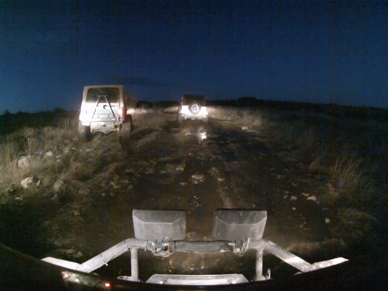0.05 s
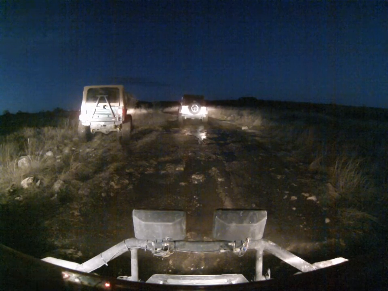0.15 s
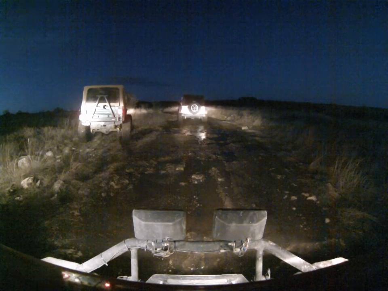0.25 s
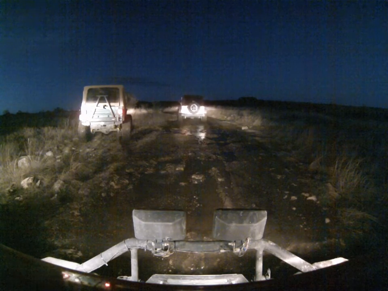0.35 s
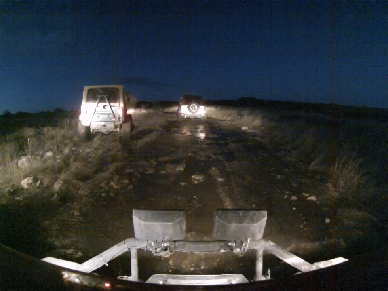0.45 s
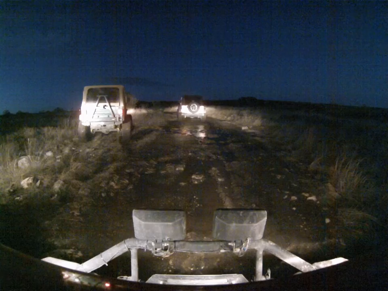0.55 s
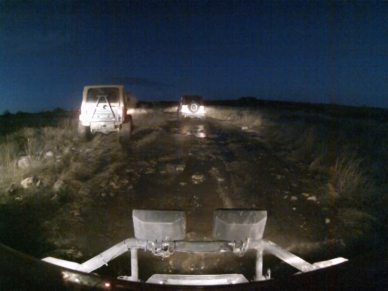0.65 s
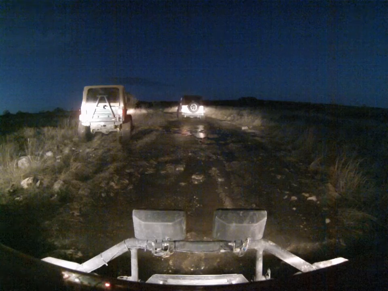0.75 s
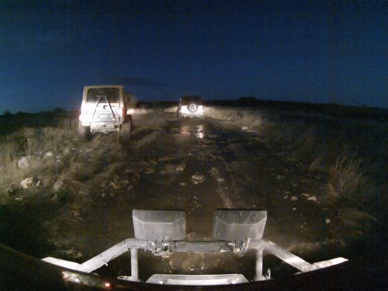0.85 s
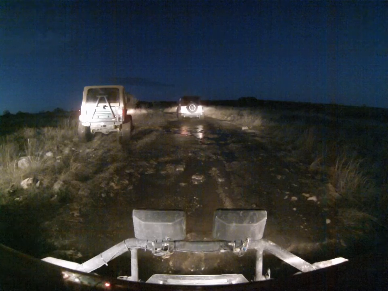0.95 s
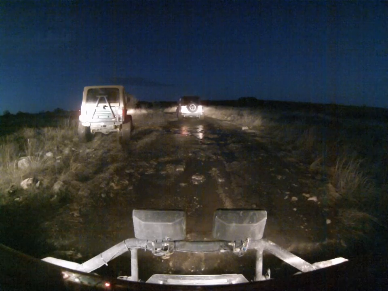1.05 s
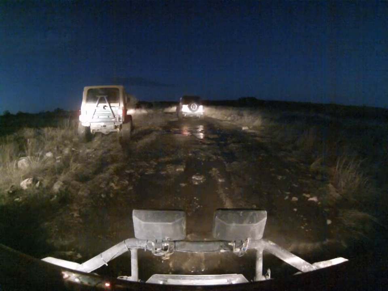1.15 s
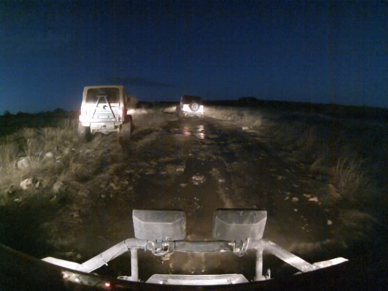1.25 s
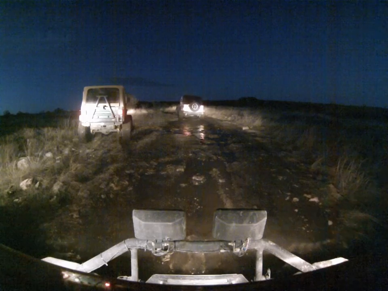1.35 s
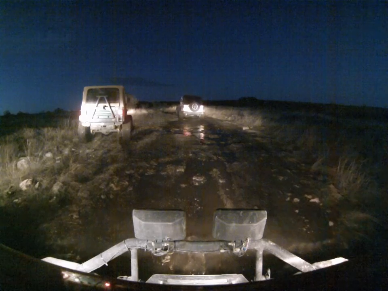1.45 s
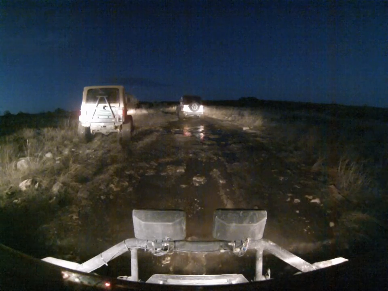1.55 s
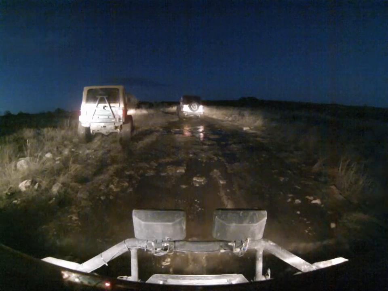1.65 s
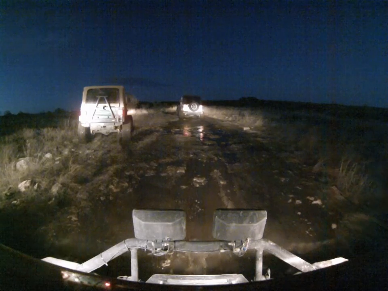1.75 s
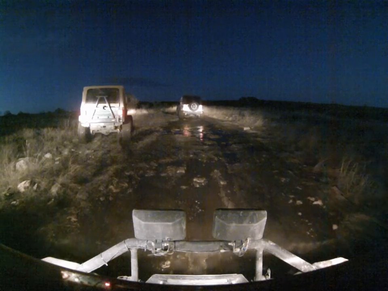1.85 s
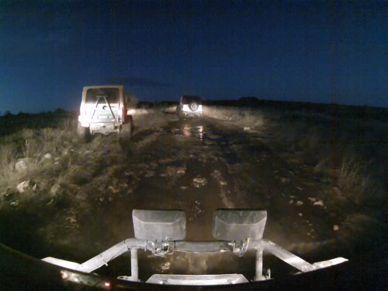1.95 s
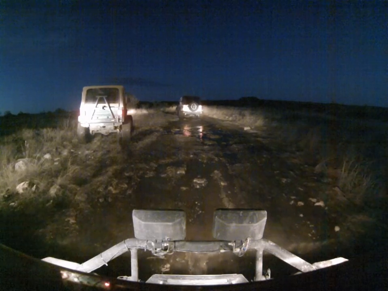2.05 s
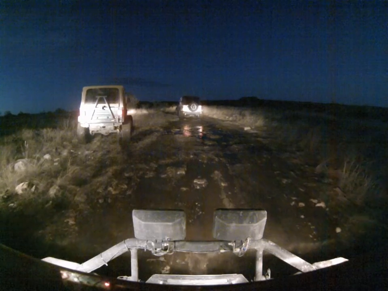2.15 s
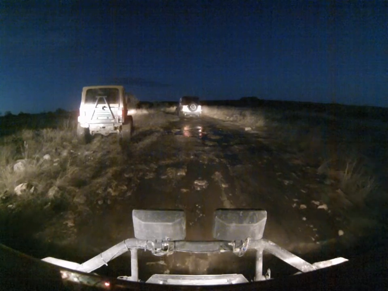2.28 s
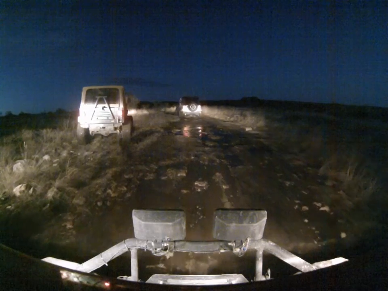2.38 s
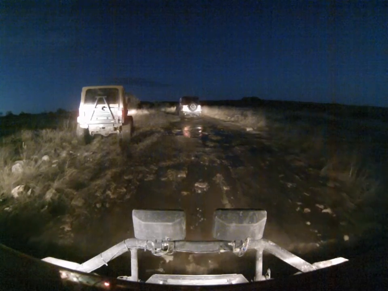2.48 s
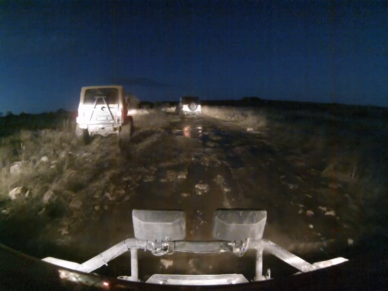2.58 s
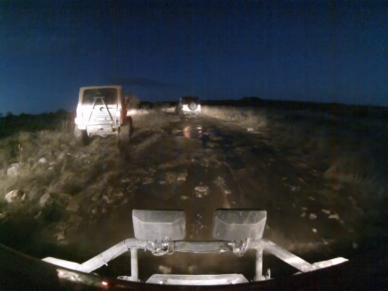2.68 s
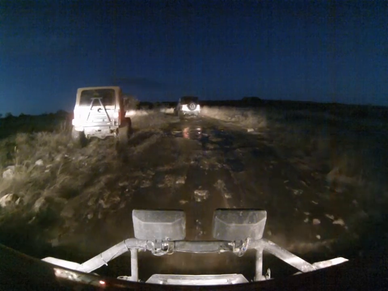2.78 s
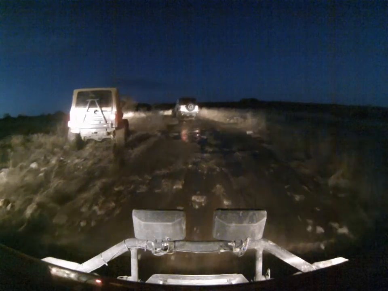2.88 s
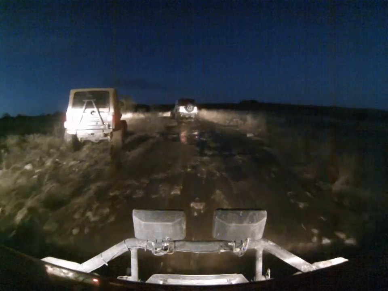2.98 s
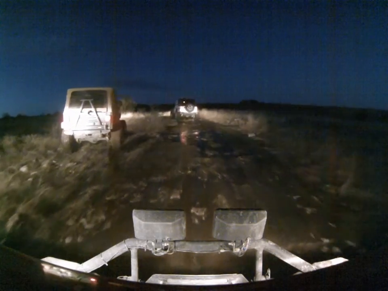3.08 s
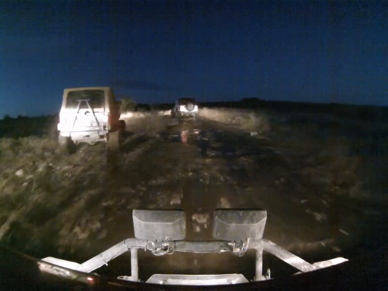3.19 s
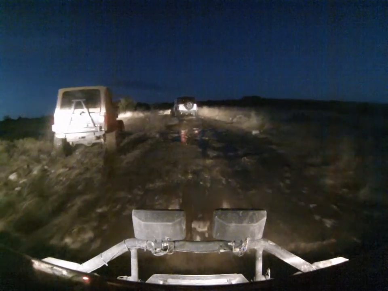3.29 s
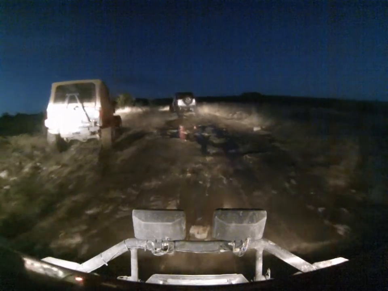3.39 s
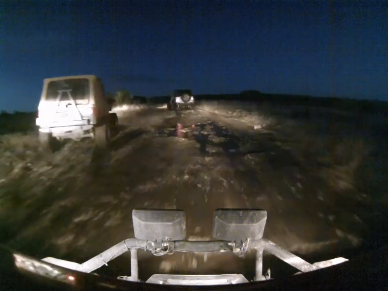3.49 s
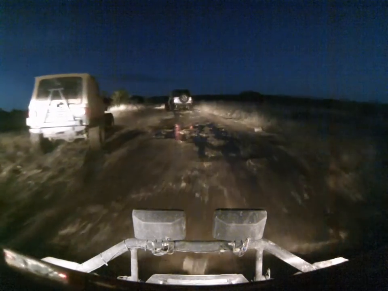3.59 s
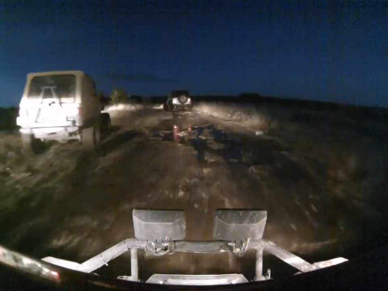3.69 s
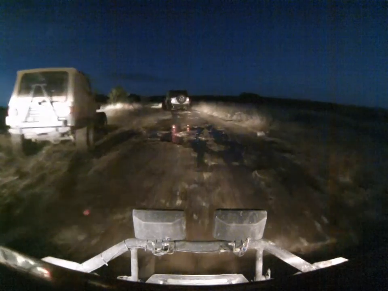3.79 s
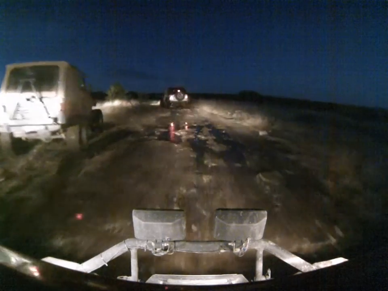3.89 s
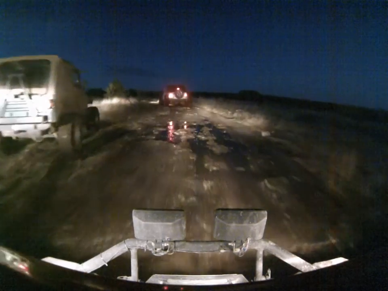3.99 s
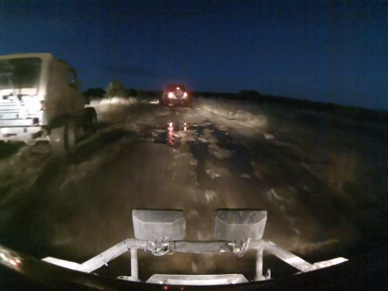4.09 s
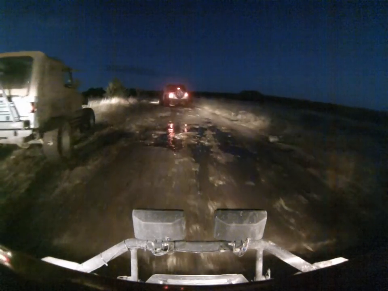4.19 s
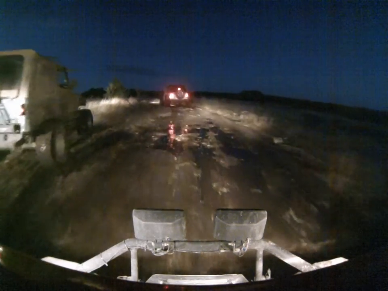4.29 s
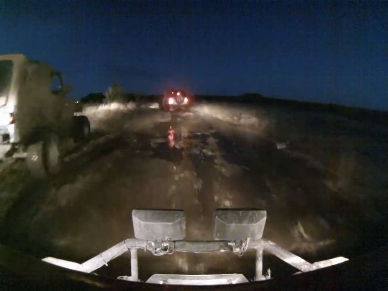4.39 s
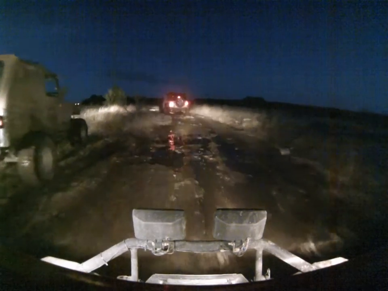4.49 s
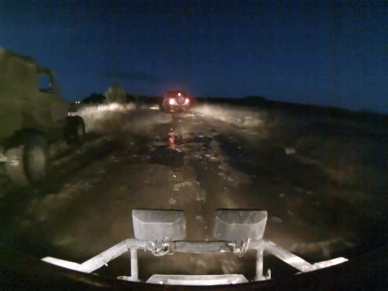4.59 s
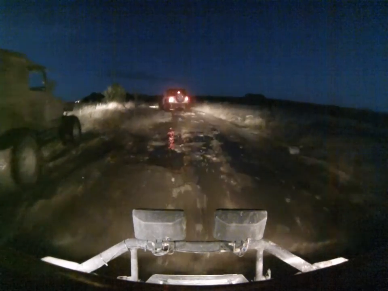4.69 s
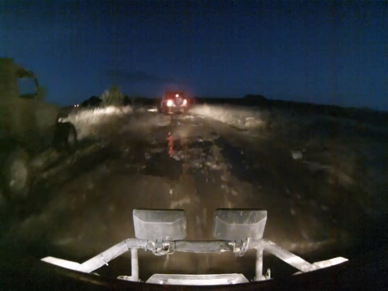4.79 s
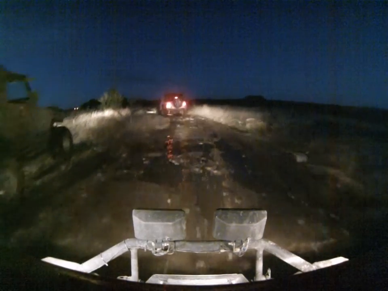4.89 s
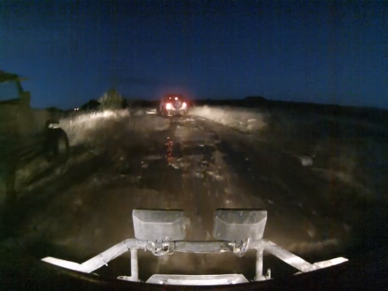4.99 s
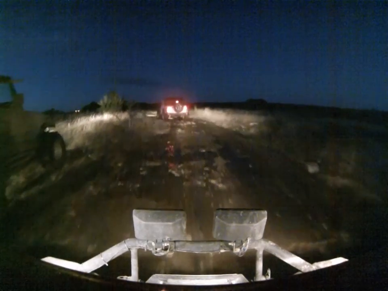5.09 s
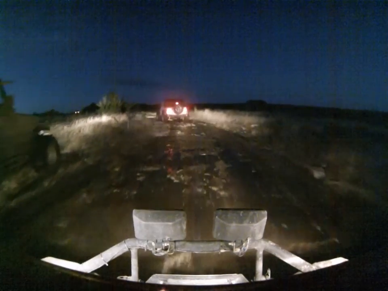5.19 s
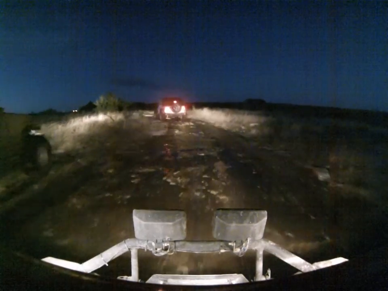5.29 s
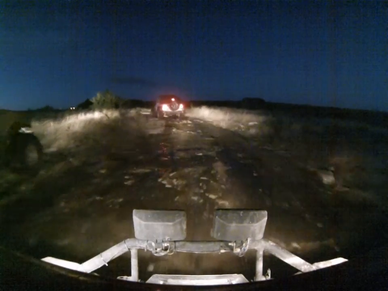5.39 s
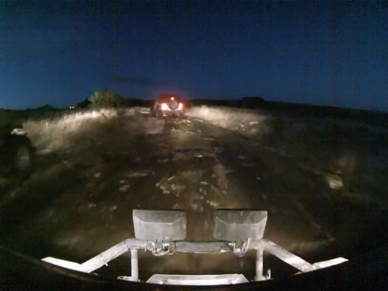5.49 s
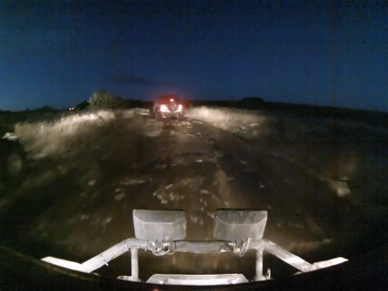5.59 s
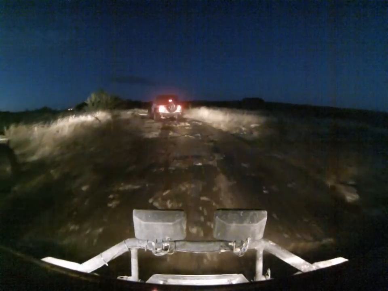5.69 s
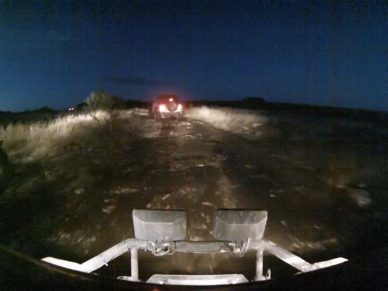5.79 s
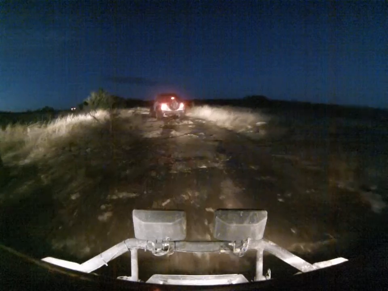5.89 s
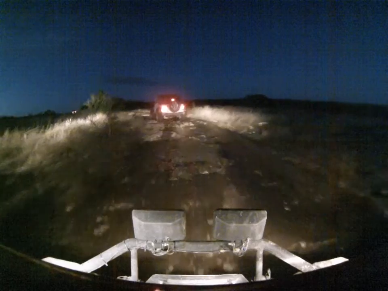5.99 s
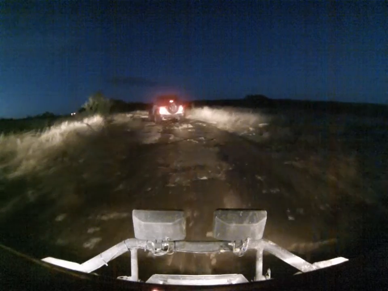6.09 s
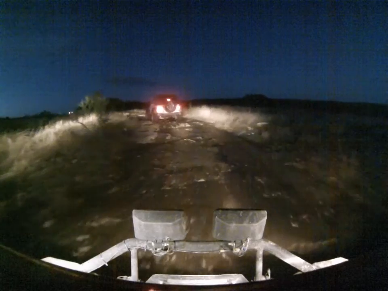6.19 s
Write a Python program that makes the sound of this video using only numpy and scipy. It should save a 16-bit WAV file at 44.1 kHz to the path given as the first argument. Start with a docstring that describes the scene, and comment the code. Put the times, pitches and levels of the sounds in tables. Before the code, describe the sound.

Close, muffled car interior on a stony track. At first there is mostly quiet engine drone and faint low boom, with one gentle swell of revs. Then the car starts jolting: tyres thump, loose panels knock and rattle, a dry joint chirps, and a small fitting ticks brightly. The heaviest clatter comes in the second half, over a low shuddering body rumble, before settling.

```python
"""Stony track from inside the car

A small camera inside the windscreen of a four-wheel-drive car crawling over a stony track.
Firing tone and filtered noise give the engine's hum and dull roar; wavering low tones boom in the body.
Wheel thuds ring frame modes, clunks of loose parts ring panel modes, both from short noisy blows.
A dry joint squeaks in paired, nearly steady tones, and a light fitting ticks in evenly spaced bright clicks.
"""
import sys
import numpy as np
from scipy import signal
from scipy.io import wavfile
from scipy.ndimage import uniform_filter1d

SR = 44100
rng = np.random.default_rng(int(sys.argv[2]) if len(sys.argv) > 2 else 0)


def wav_record(signal):
    """Record a signal, one row per channel, as 16-bit PCM in the file named by sys.argv[1]."""
    frames = np.transpose(np.atleast_2d(signal))
    bounded = np.clip(frames, -1, 1)
    # unit amplitude maps onto the largest positive 16-bit level
    quanta = np.round(bounded * 32767).astype(np.int16)
    wavfile.write(sys.argv[1], SR, quanta)


N = 275625
T = np.arange(N) / SR

# Engine firing tone. Each row: time in seconds, pitch in Hz, mean rms level in dB.
FIRING = [(0.3, 121.9, -63), (0.5, 124.1, -59), (0.75, 131.9, -56.5), (0.95, 127, -64), (1.05, 126.9, -52),
          (1.3, 132.5, -45), (1.5, 134.7, -42.5), (1.68, 132.9, -40.5), (1.79, 130.5, -50),
          (1.9, 129.4, -48), (2.0, 123, -57), (2.2, 119.3, -51.5), (2.43, 116.6, -53.5), (2.6, 111.7, -62),
          (2.75, 114.4, -77), (2.9, 132.2, -57.5), (3.2, 127, -60)]
# Engine and rolling noise. Each row: time in seconds, mean roar level in dB, low rumble level in dB.
ROAR_LEVELS = [(0.0, -60.5, -58.5), (0.35, -61, -58.5), (1.06, -52, -49.5), (1.6, -52, -47.5),
               (2.19, -52.5, -50), (2.6, -53.5, -51), (3.08, -56.5, -52), (3.76, -51, -47.5),
               (4.18, -53.5, -49.5), (4.5, -51.5, -47), (4.94, -47, -45), (5.07, -53, -50), (5.5, -54, -50),
               (6.13, -54, -49.5), (6.25, -58, -52)]
# Cabin resonances. Each row: centre in Hz, nominal width in Hz, relative level in dB.
CABIN_MODES = [(690, 46, -10.5), (1072.5, 190, -4.5), (1540, 232, -13), (2241, 252, -8.5),
               (2479, 110, -12.5), (2935, 58, -16), (3544, 325, -22), (4990, 240, -30), (5740, 220, -36),
               (6310, 600, -37), (7740, 370, -41.5), (9300, 460, -48), (10900, 1500, -45.5)]
# Frame modes. Each row: centre in Hz, nominal width in Hz, relative level in dB when the engine
# shakes it, relative level in dB when a wheel strikes it.
FRAME_MODES = [(85, 33.8, -7.5, 3.5), (122.1, 26.8, 1.5, 0.5), (171.3, 15.2, -4, 0),
               (275.5, 20.5, -10.5, 1), (321.5, 48.6, -9.5, 1.5), (398.4, 29, -1.5, 4),
               (452.4, 51.7, -8, -10), (509, 95, -23, -14)]
# Body boom, lowest mode. Each row: time in seconds, mean rms level in dB.
BOOM_LEVELS = [(0.0, -41.5), (0.05, -42), (0.43, -48), (0.54, -58), (0.61, -48), (0.85, -63), (0.99, -47.5),
               (1.36, -62), (1.46, -79), (1.55, -62), (1.81, -54), (2.4, -76), (2.47, -53.5), (2.82, -55.5),
               (3.25, -43), (3.38, -59), (3.46, -48), (3.55, -53), (3.64, -53), (3.69, -38.5),
               (3.76, -35.5), (3.97, -31), (4.18, -39.5), (4.3, -36.5), (4.4, -43), (4.47, -37),
               (4.51, -47.5), (4.55, -37.5), (4.61, -33.5), (4.74, -32), (4.82, -38), (4.88, -35),
               (4.96, -40.5), (5.08, -29), (5.2, -31.5), (5.3, -30.5), (5.45, -33.5), (5.61, -36),
               (5.67, -46), (5.74, -42), (5.78, -52), (5.845, -34), (5.89, -50), (5.97, -39.5), (6.04, -54),
               (6.09, -44), (6.18, -40.5), (6.25, -54)]
# Body boom, lowest mode. Each row: time in seconds, mean pitch in Hz.
BOOM_PITCH = [(0, 38.5), (.5, 37.5), (2.8, 36.86), (3.3, 35.75), (4.4, 35.54), (4.8, 36.7), (5.1, 35.63),
              (6.25, 36.04)]
# Runs of ticks. Each row: start in seconds, peak before scatter in dB, run length in seconds.
TICK_RUNS = [(4.3205, -45.5, .09), (4.687, -44, .12), (5.0107, -60, .06), (5.16, -57, 0), (5.24, -66, .03),
             (5.324, -65, 0), (6.067, -57, 0), (6.128, -59, 0), (6.1527, -51.5, 0)]
# Resonances of the ticking fitting. Each row: centre in Hz, width in Hz, relative level in dB.
TICK_MODES = [(5800, 990, -0.5), (7830, 260, 2.5), (9700, 1200, -5), (12600, 1100, -8.5),
              (14100, 820, -5.5)]
# Squeaks. Each row: start in seconds, nominal level in dB, starting pitch in Hz, pitch drift in Hz per
# second (mostly none or slight), swell time constant in seconds (before squaring), held time in seconds,
# second partial in Hz, second partial level in dB, third harmonic level in dB (both against the main tone).
SQUEAKS = [(3.369, -62, 5660, -15000, .001, 0.014, 11300, -7, -50),
           (3.374, -59, 4830, 5000, .002, 0.026, 9500, -4, -50),
           (3.468, -30.5, 3570, 0, .004, 0.0052, 7500, -21.5, -16.5),
           (3.479, -36, 3550, -1000, 0.0015, 0.019, 6600, -24, -25),
           (3.503, -50, 3600, 0, .002, 0.0086, 7200, -40, -40),
           (3.522, -63, 3550, 0, 0.0032, 0.026, 7200, -40, -40),
           (3.543, -74, 9150, 0, .002, 0.02, 12000, -40, -50),
           (3.625, -77, 9100, 0, .003, 0.013, 12000, -40, -50),
           (4.446, -50, 3620, 0, .001, 0.0099, 7300, -30, -24),
           (4.633, -26, 3577, 0, 0.0046, 0.0066, 7100, -34, -35),
           (4.845, -47, 3860, 0, .003, .016, 7700, -30, -35),
           (4.838, -38.5, 3630, -500, 0.0021, 0.029, 6900, -19, -24),
           (4.891, -41, 3860, 0, .003, 0.024, 7840, -12, -17),
           (4.928, -42, 3630, 0, .003, 0.019, 7300, -30, -35),
           (4.924, -39, 3860, -500, 0.0037, 0.02, 7750, -12, -24),
           (6.052, -49, 3550, -1, .002, 0.028, 7100, -38, -32)]
# Wheel thuds. Each row: start in seconds, nominal peak in dB, pitch of the blow in Hz,
# level in dB given to the second body mode.
THUDS = [(2.999, -42, 141, -58), (3.287, -38, 110, -50), (3.435, -36, 400, -60), (3.45, -31, 120, -48),
         (3.615, -41, 280, -60), (3.669, -33.5, 109, -48), (3.7, -38.5, 390, -60), (3.717, -35, 130, -46),
         (3.93, -38.5, 390, -58), (4.275, -28, 170, -50), (4.298, -37, 150, -49), (4.429, -35, 150, -52),
         (4.469, -31.5, 150, -45), (4.495, -31, 130, -55), (4.516, -33.5, 290, -50), (4.549, -34, 170, -46),
         (4.64, -30, 270, -35), (4.68, -36, 330, -45), (4.7, -31.5, 151, -38), (4.8, -38, 130, -40),
         (4.829, -33, 380, -45), (4.86, -28.5, 130, -32.5), (4.88, -33, 300, -45), (4.9, -36, 120, -42),
         (4.955, -28.5, 225, -48), (4.995, -33.5, 169, -52), (5.141, -36, 170, -55),
         (5.165, -33.5, 370, -55), (5.18, -30, 149, -43), (5.22, -33.5, 300, -47), (5.601, -34, 400, -48),
         (5.633, -28.5, 120, -50), (5.69, -32.5, 300, -50), (5.775, -33.5, 308, -54),
         (5.829, -39.5, 250, -47), (5.979, -37, 151, -52), (6.0, -40, 400, -58)]
# Clunks. Each row: start in seconds, nominal peak in dB, pitch of the blow in Hz,
# treble share in dB, rattle t60 in seconds.
CLUNKS = [(2.699, -42, 1310, -17.5, 0.12), (3.308, -42.5, 1070, -25, .07), (3.388, -43, 930, -39, .09),
          (3.663, -37.5, 1114, -22, .07), (3.866, -38.5, 1094, -33, 0.057), (4.157, -35, 1360, -17, 0.04),
          (4.262, -41, 2200, -18, 0.063), (4.276, -36, 2220, -25, 0.083), (4.295, -41, 1120, -30, 0.063),
          (4.318, -32.5, 1410, -22, 0.054), (4.442, -33.5, 1310, -15.5, 0.062),
          (4.47, -37.5, 1200, -21, .08), (4.505, -27.5, 1513, -30, 0.2), (4.514, -36, 2020, -2, 0.038),
          (4.526, -30.5, 2170, -25, 0.083), (4.53, -35, 1080, -35, .08), (4.638, -18.5, 1500, -9.5, 0.018),
          (4.642, -22.5, 1106, -32, 0.039), (4.644, -23, 3280, -22, 0.082), (4.648, -18, 2230, -17, 0.033),
          (4.658, -25.5, 2330, -20, 0.13), (4.812, -34.5, 1150, -22, 0.072), (4.837, -39, 1980, -14, 0.054),
          (4.869, -29, 1605, -26, 0.1), (4.898, -36, 1580, -25, .08), (4.92, -36, 2160, -28, .07),
          (4.948, -29.5, 1554, -29, .03), (4.949, -23.5, 2400, -7.5, 0.07), (4.953, -30, 1135, -26, .05),
          (4.954, -33, 3330, -11, 0.061), (4.961, -24, 2170, -24, 0.057), (4.995, -34, 870, -39, 0.076),
          (5.142, -42.5, 2170, -31, 0.099), (5.157, -32.5, 1060, -27, 0.065),
          (5.168, -47.5, 3600, -22, 0.076), (5.172, -33, 1125, -23, 0.064), (5.19, -35, 1560, -29, .08),
          (5.201, -50, 4110, -22, .05), (5.208, -34.5, 866, -43, 0.099), (5.218, -38, 2280, -28, .05),
          (5.24, -39.5, 860, -40, 0.073), (5.262, -43, 854, -43, .08), (5.633, -38, 1460, -17.5, 0.098),
          (5.654, -36.5, 2400, -25, .06), (5.67, -26.5, 1570, -38, 0.039), (5.681, -28, 1626, -12.5, 0.096),
          (5.704, -40, 2160, -27, 0.042), (5.768, -22, 2410, -8, 0.044), (5.773, -21.5, 1133, -10.5, 0.07),
          (5.775, -24, 3530, -21, 0.068), (5.786, -21, 2410, -30, 0.03), (5.806, -27.5, 1060, -39, 0.12),
          (5.999, -35.5, 1090, -20, 0.033), (6.046, -38.5, 1040, -22, 0.08)]
# Panels and loose parts. Each row: mode in Hz, relative level in dB, nominal t60 in seconds.
PANEL_MODES = [(696, -7.5, 0.24), (742.5, -1.5, 0.33), (854, -9, 0.21), (892.6, -2.5, 0.22),
               (935, -2, 0.23), (1022, -6.5, 0.13), (1084.5, 1, 0.077), (1159, -3, 0.11),
               (1536, -1.5, 0.074), (1603, -8, 0.11), (1855, -2.5, 0.21), (2133, -3, 0.15), (2230, 0, 0.1),
               (2275, -5.5, 0.18), (2360, -6.5, 0.14), (2423, 1, 0.11), (2490, -7.5, 0.33),
               (3003, -6, 0.12), (3280, -14.5, 0.12), (3562, -4.5, 0.057), (3580, -10, 0.1),
               (3840, -7.5, 0.056), (4105, -13, 0.092)]
# Bright crack of a clunk. Each row: centre in Hz, nominal width in Hz, relative level in dB.
CRACK_MODES = [(5120, 850, -46), (4150, 530, 11), (5690, 230, 14.5), (7040, 340, 4.5), (6060, 220, -17),
               (7600, 240, 3), (10700, 590, -8.5), (11380, 590, 0), (13200, 970, -32)]

HISS_DB, TOP_HZ = -82, 15300  # microphone hiss, rms; upper limit of the sound
# second body mode: mean pitch, idle level before wander, rise and ring after a thud
SECOND_HZ, SECOND_IDLE_DB, SECOND_RISE_S, SECOND_T60_S = 50.9, -64.5, 0.013, 0.71
SWAY_HZ, SWAY_WIDTH_HZ, SWAY_DB = 25, 16, -0.5  # loose low shaking, against the second mode
TICK_PERIOD_S, TICK_SCATTER_DB = 0.032, 1.5
RASP_DB, RASP_WIDTH_HZ, GRIT_DB = -16, 220, -28  # rubbing noise around the tone and above it
GRIP_SAG_DB_PER_S = 66  # weakening of the grip, before the envelope is squared
TWIN_RATIO, TWIN_DB = 1.035, -7  # a neighbouring mode sings along and beats with the tone
THUD_T60_S, PUSH_S, PUSH_GAIN = 0.08, 0.0018, 3.6  # noise decay; length and strength of first contact
THUD_FOCUS_DB, THUD_CREST_DB = 8, 10  # loss an octave from the pitch; nominal peak over the first 20 ms
RATTLE_S, FIRST_BLOW = 0.007, 23.5  # bounces at full strength; the first contact against them
SHUDDER_DB, SHUDDER_T60_S = -9.5, 0.2  # faint shaking after the bounces
STRUCK_DB, STRUCK_Q = -2.5, 19  # the struck part's own short ring at the pitch of the blow
FOCUS_DB, FOCUS_PER_DULL_DB = -4.5, 0.62  # offset of the loss an octave away; added per dB of dullness


def undb(db):
    """Decibels to gain."""
    return 10 ** (np.asarray(db) / 20)


def level(x, db):
    """Scale to an rms level."""
    return x * undb(db) / np.sqrt(np.mean(x ** 2))


def peaked(x, crest_db):
    """Scale a hit so that the rms of its first 20 ms lies crest_db under 1."""
    return x * undb(-crest_db) / np.sqrt(np.mean(x[:SR // 50] ** 2))


def curves(table):
    """Columns of a table after the time column, one value per sample."""
    s, *columns = np.transpose(table)
    return [np.interp(T, s, c) for c in columns]


def band(x, hz, width):
    """Two-pole resonance, gain 1 at the centre."""
    return signal.lfilter(*signal.iirpeak(min(hz, .45 * SR), hz / width, fs=SR), x)


def body(x, peaks):
    """A set of resonances; neighbours swing in opposite phase."""
    out = 0
    for k, (hz, width, db) in enumerate(peaks):
        out = out + (-1) ** k * undb(db) * band(x, hz, width)
    return out


def walk(rate):
    """Random levels held 1 / rate s and slewed twice; spread near 1."""
    k = int(SR / rate)
    steps = np.repeat(rng.standard_normal(N // k + 1), k)
    return 1.32 * uniform_filter1d(uniform_filter1d(steps, k), k)[:N]


def add(out, s, x):
    """Mix a short sound in at time s."""
    i = int(s * SR)
    out[i:i + len(x)] += x[:N - i]


def shape(held, t60, rise):
    """Envelope: quick rise, hold, exponential fall; also returns its time axis."""
    t = np.arange(SR // 3) / SR
    fall = undb(-60 * np.maximum(t - held, 0) / max(t60, .003))
    return (1 - np.exp(-t / rise)) * fall, t


def tone(hz, db):
    """A sine that follows pitch and rms level."""
    return np.sqrt(2) * undb(db) * np.sin(2 * np.pi * np.cumsum(hz) / SR)


def engine():
    """Firing tone, roar that pulses with it through cabin resonances, and steady noise through the frame."""
    hz, db = curves(FIRING)
    fade = np.clip(np.minimum(T - FIRING[0][0], FIRING[-1][0] - T) / 0.072, 0, 1)
    fundamental = tone(hz * (1 + 0.0025 * walk(8.8)), db + 0.71 * walk(15))
    hum = fade * (fundamental + tone(2 * hz, db - 31.0))
    roar_db, rumble_db = curves(ROAR_LEVELS)
    beat = 1 + 0.12 * np.sin(2 * np.pi * np.cumsum(hz) / SR)
    roar, rumble = np.zeros(N), np.zeros(N)
    for f, w, g in CABIN_MODES:
        noise = beat * rng.standard_normal(N)
        roar += undb(g + 0.78 * walk(9.8)) * band(band(noise, f, 1.08 * w), f, 3 * w)
    for f, w, g, _ in FRAME_MODES:
        noise = rng.standard_normal(N)
        rumble += undb(g + 2.22 * walk(11)) * band(band(noise, f, 1.6 * w), f, 3 * w)
    surge_db = 0.72 * walk(14)  # uneven load moves all the roar bands together
    return hum + level(roar, 0) * undb(roar_db + surge_db) + level(rumble, 0) * undb(rumble_db)


def boom():
    """The body shell's lowest mode as a wavering tone, and a looser second mode rung by the wheel thuds."""
    (hz,), (db,) = curves(BOOM_PITCH), curves(BOOM_LEVELS)
    lowest = tone(hz * (1 + 0.0099 * walk(5.99)), db + 1.1 * walk(8.1))
    power = undb(2 * (SECOND_IDLE_DB + 4.8 * walk(6.8)))
    for s, _, _, ring_db in THUDS:
        t = np.maximum(T - s, 0)
        rise = 1 - np.exp(-t / SECOND_RISE_S)
        power += undb(2 * ring_db - 120 * t / SECOND_T60_S) * rise ** 2
    second_db = 10 * np.log10(power)
    second = tone(SECOND_HZ * (1 + 0.042 * walk(14)), second_db + 2.0 * walk(6.9))
    shaking = band(band(rng.standard_normal(N), SWAY_HZ, SWAY_WIDTH_HZ), SWAY_HZ, 2 * SWAY_WIDTH_HZ)
    return lowest + second + undb(second_db) * level(shaking, SWAY_DB)


def ticks():
    """A light fitting taps in evenly spaced runs: each tap is a tiny noise burst through bright resonances."""
    out = np.zeros(N)
    env, t = shape(0.00057, 0.007, 0.00029)
    for start, db, length in TICK_RUNS:
        for s in start + TICK_PERIOD_S * np.arange(round(length / TICK_PERIOD_S) + 1):
            tap = body(env * rng.standard_normal(len(t)), TICK_MODES)
            add(out, s, undb(db + TICK_SCATTER_DB * rng.standard_normal()) * tap / np.abs(tap).max())
    return out


def squeaks():
    """Fast stick-slip of a dry joint: two close raspy tones swell, waver and beat, with brief overtones."""
    out = np.zeros(N)
    waver = .15 * walk(60) + .8 * walk(1500)
    throb = np.tanh(walk(200))
    for s, db, hz, drift, swell, held, second_hz, second_db, third_db in SQUEAKS:
        env, t = shape(held, 0.081, swell)
        part = slice(int(s * SR), int(s * SR) + len(t))
        env = env * undb(-GRIP_SAG_DB_PER_S * t)
        env = env ** 2 / env.max() ** 2
        length = len(waver[part])  # cut short at the end of the scene
        env, t = env[:length], t[:length]
        pitch_ratio = (1 + drift * np.minimum(t, held) / hz) * (1 + 0.023 * waver[part])
        turns = 2 * np.pi * np.cumsum(pitch_ratio) / SR  # phase per Hz of pitch
        twin = undb(TWIN_DB) * np.sin(TWIN_RATIO * hz * turns + 2 * np.pi * rng.random())
        rub = rng.standard_normal(len(t))
        rasp = level(band(band(rub, 1.07 * hz, RASP_WIDTH_HZ), 0.91 * hz, 2 * RASP_WIDTH_HZ), RASP_DB)
        grit = level(band(band(rub, 2.1 * hz, 2.2 * hz), 2.1 * hz, 2.2 * hz), GRIT_DB)
        second = undb(second_db) * np.sin(second_hz * turns)
        third = undb(third_db) * np.sin(3 * hz * turns)
        voice = np.sin(hz * turns) + twin + rasp + np.exp(-t / 0.015) * (grit + second + third)
        slip = undb(db + 2.3 * throb[part]) * env * voice
        add(out, s, slip + 0.39 * band(slip, hz, 35))  # the rubbed part rings on
    return out


def thuds():
    """Soft blow of tyre on stone: a short push and a little noise ring the frame modes near its pitch."""
    out = np.zeros(N)
    for s, db, pitch_hz, _ in THUDS:
        env, t = shape(0.02, THUD_T60_S, 0.0035)
        contact = PUSH_GAIN * np.sin(np.pi * np.minimum(t / PUSH_S, 1))
        push = env * rng.standard_normal(len(t)) + contact
        blow = np.zeros(len(t))
        for f, w, _, g in FRAME_MODES:
            near_db = -THUD_FOCUS_DB * np.log2(f / pitch_hz) ** 2
            blow += undb(g + near_db) * band(band(push, f, 1.06 * w), f, 1.86 * w)
        add(out, s, undb(db) * peaked(blow, THUD_CREST_DB))
    return out


def clunks():
    """A knock and uneven bounces ring the panel modes near its pitch; in the crack the top dies first."""
    out = np.zeros(N)
    for s, db, pitch_hz, treble_db, t60 in CLUNKS:
        env, t = shape(RATTLE_S, t60, 0.00061)
        steps = np.repeat(rng.standard_normal(len(t) // 100 + 1), 100)
        bounces = undb(2.0 * uniform_filter1d(steps, size=30)[:len(t)])
        shudder = undb(SHUDDER_DB - 60 * t / SHUDDER_T60_S)
        rattle = (env + shudder) * bounces * rng.standard_normal(len(t))
        crack = np.zeros(len(t))
        for f, w, g in CRACK_MODES:
            crack += undb(g) * band(band(rattle * np.exp(-t * f / 300), f, 2.4 * w), f, 2.4 * w)
        rattle[0] = FIRST_BLOW  # the first contact is one sharp blow
        struck_width = pitch_hz / STRUCK_Q
        ring = undb(STRUCK_DB) * band(band(rattle, pitch_hz, struck_width), pitch_hz, 2 * struck_width)
        strike = rng.standard_normal(len(PANEL_MODES))  # each blow lands elsewhere
        octave_loss_db = FOCUS_DB - FOCUS_PER_DULL_DB * treble_db  # a duller blow picks out fewer modes
        for (hz, g, decay), luck in zip(PANEL_MODES, strike):
            near_db = -octave_loss_db * np.log2(hz / pitch_hz) ** 2
            softened = band(band(rattle, hz, hz), hz, 0.33 * hz)
            ring = ring + undb(g + near_db + 2 * luck) * band(softened, hz, 3.0 / decay)
        add(out, s, undb(db) * (peaked(ring, 10.43) + undb(treble_db) * peaked(crack, 10.75)))
    return out


def scene():
    """All sources at one microphone."""
    return (engine() + boom() + ticks() + squeaks() + thuds() + clunks())[None, :]


def record(dry):
    """Faint microphone hiss; the loudest peaks are rounded and the top is cut steeply."""
    hiss = level(band(rng.standard_normal(N), 5600, 6800), HISS_DB)
    rounded = np.tanh(4 * (dry + hiss)) / 4
    top_cut = signal.ellip(10, .5, 80, TOP_HZ, fs=SR, output="sos")
    return signal.sosfilt(top_cut, rounded)


dry = scene()
out = record(dry)
wav_record(out)
```